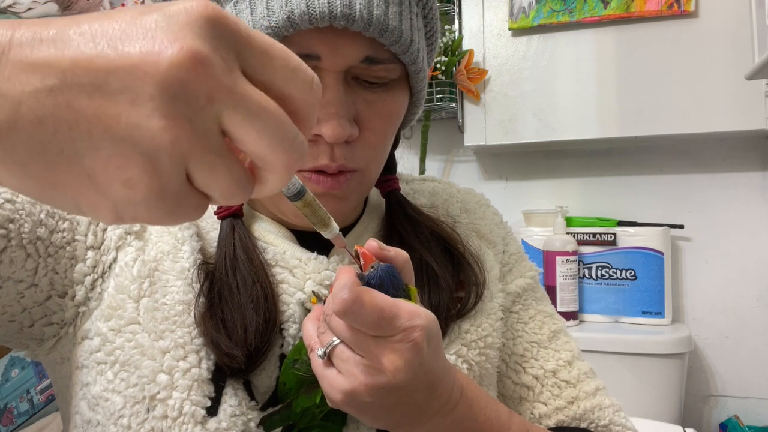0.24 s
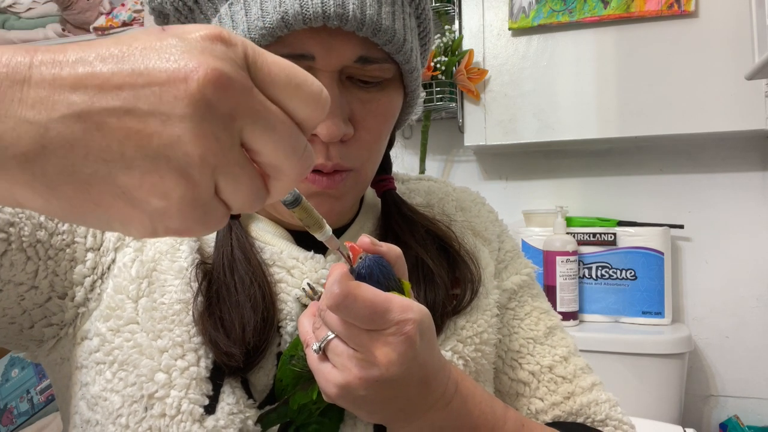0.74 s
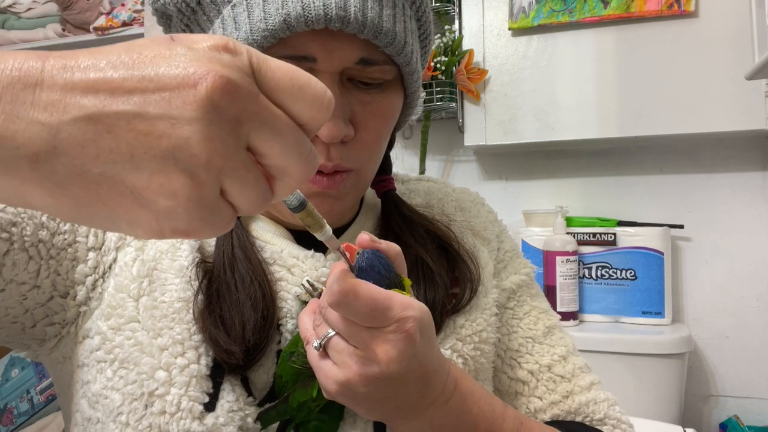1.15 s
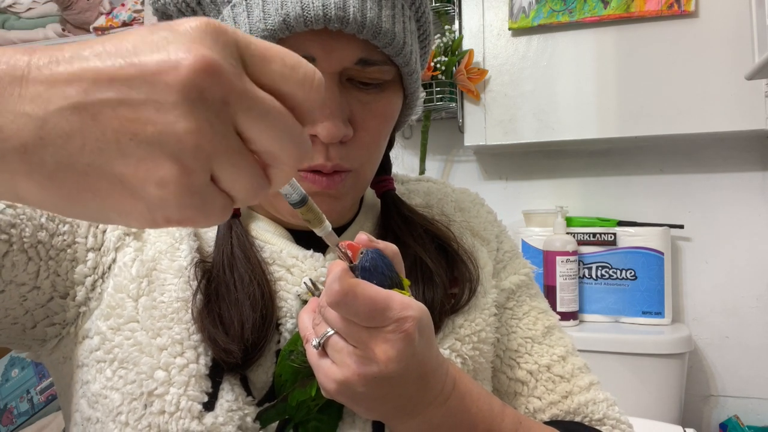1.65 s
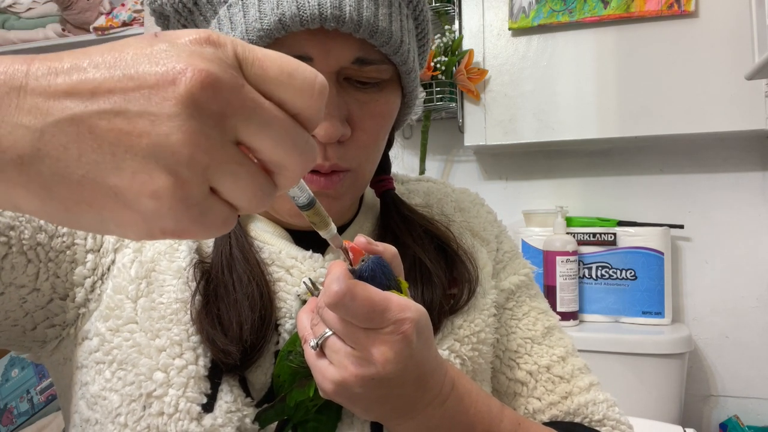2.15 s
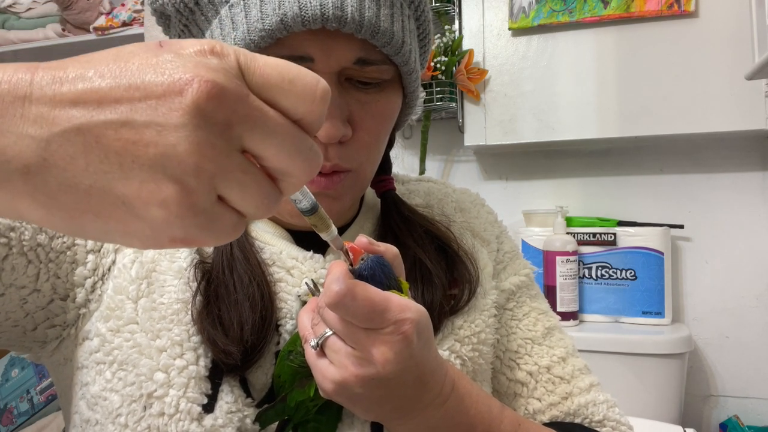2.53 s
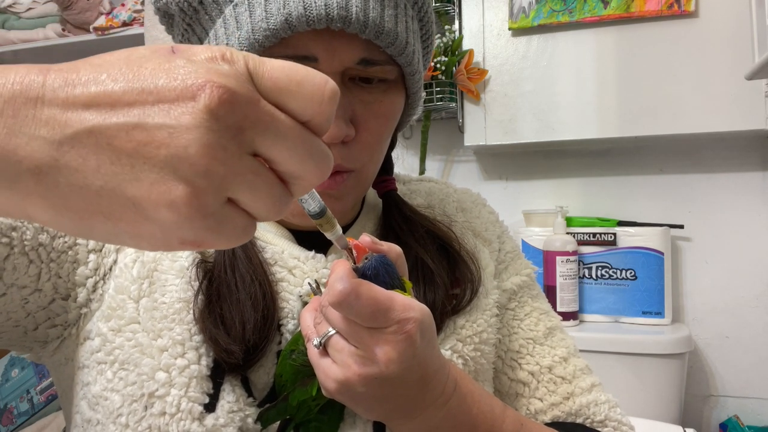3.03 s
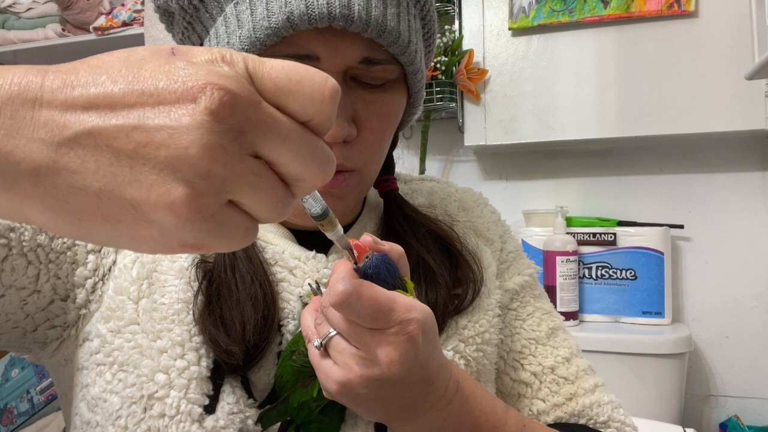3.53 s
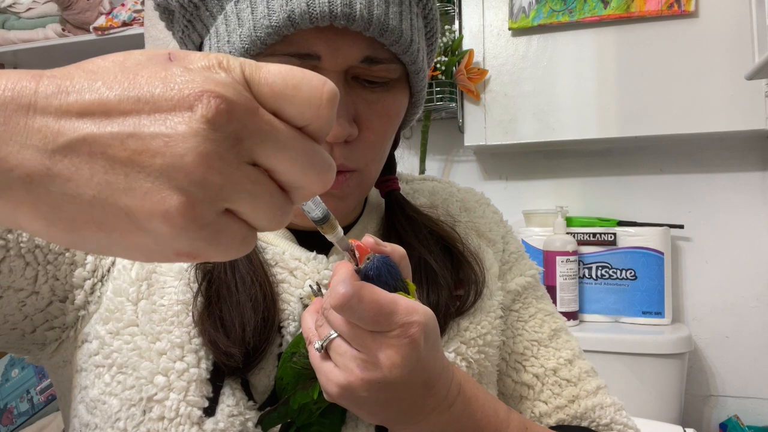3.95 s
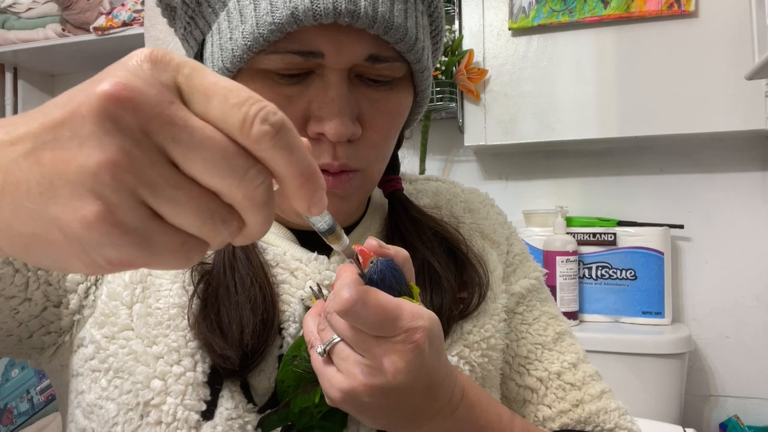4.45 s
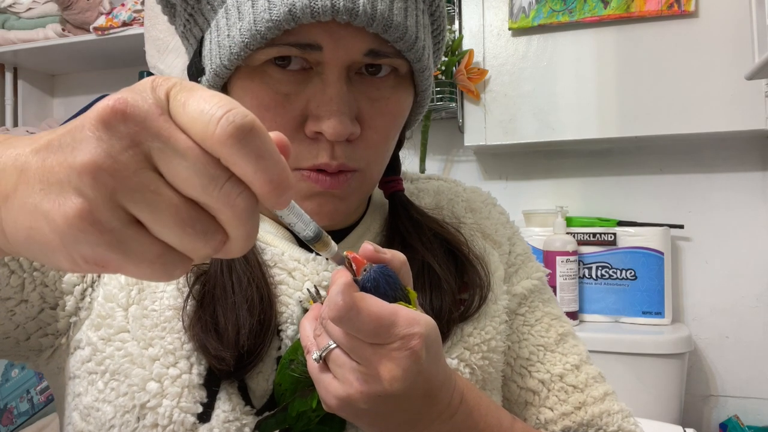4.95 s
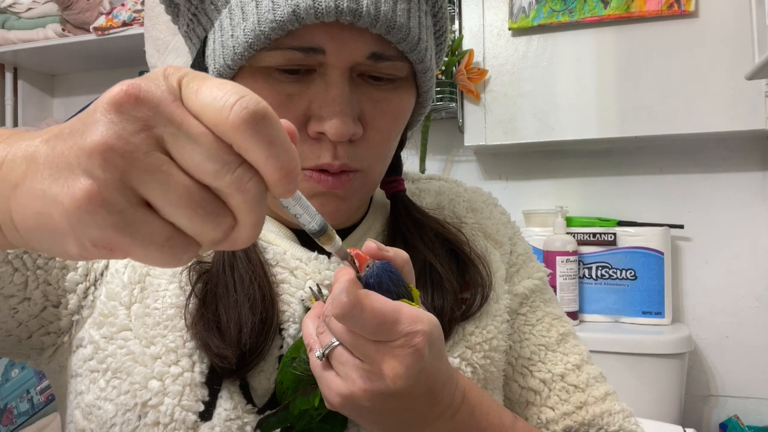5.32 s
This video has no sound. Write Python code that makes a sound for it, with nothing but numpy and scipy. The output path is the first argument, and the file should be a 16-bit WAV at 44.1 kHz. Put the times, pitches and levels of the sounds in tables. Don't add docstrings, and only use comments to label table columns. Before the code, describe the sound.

A small parrot held in the hand screeches close to a stereo microphone in a small tiled room with a short, bright echo. A loud call is already sounding at 0 s, falters briefly, swells and ends at 0.25. Eleven more follow at about 0.45, 0.95, 1.45, 2.0, 2.5, 2.9, 3.4, 3.85, 4.4, 4.7 and 5.2 s, mostly a quarter to a third of a second long; the one at 4.4 is clipped short. The second to fourth are somewhat softer. Each is a hoarse, noisy buzz near 900-1000 Hz, chopped by rapid flutter, with piercing upper rasp and small beak squeaks at the edges. Faint whistled in-breaths come near 0.8, 1.85, 2.8 and 4.2; tiny wet hisses near 1.9, 2.4 and 3.35, a low gulp at 4.25. Hand rumble bumps softly near 1.9 and 4.4 over barely audible hum and air. The last call ends about 5.5.

```python
import sys
import numpy as np
from scipy import signal
from scipy.fft import rfft, irfft, next_fast_len
from scipy.io import wavfile
from scipy.ndimage import uniform_filter1d, map_coordinates

SR = 44100
rng = np.random.default_rng(int(sys.argv[2]) if len(sys.argv) > 2 else 0)


def convert_level_to_amplitude(level_db):
    exponent = np.asarray(level_db, float) / 20
    return 10 ** exponent


def transcribe(signal):
    frames = np.atleast_2d(signal).T
    limited = np.clip(frames, -1, 1)
    pcm = np.round(limited * 32767).astype(np.int16)
    wavfile.write(sys.argv[1], SR, pcm)


N = 246078

# start_s, end_s, swell_to_peak_s, peak_db, sag_until_release_db
CRIES = [(-.2, 0.253, .2, -19, -4.5), (0.441, .765, 0.033, -27.5, -0.5), (0.966, 1.27, .07, -24, -5.5),
         (1.454, 1.79, .08, -25, -2), (1.993, 2.227, .055, -21, -2), (2.491, 2.688, 0.053, -21.5, -2.5),
         (2.876, 3.171, 0.03, -21.5, -3), (3.381, 3.647, 0.089, -21.5, -1.8),
         (3.842, 4.11, 0.045, -21.5, -2), (4.376, 4.528, 0.091, -20.5, -4.5),
         (4.678, 5.015, 0.049, -22.5, -3), (5.211, 5.509, 0.048, -21.5, -6)]
# throat_over_beak_db, throat_drift_over_hold_db, chest_over_beak_db,
# tongue_over_beak_db, flutter_per_s
TRACT = [(0.5, 1, -23, -10, 162), (-12, 3, -19, -6.5, 117), (1, -10, -18, -5, 118),
         (4.5, -2, -17.5, -5, 125), (-4.5, -1.5, -23, -10.5, 115), (-2.5, -1, -18.5, -9.5, 165),
         (-5, 0.5, -22, -12, 115), (-9.5, 2.5, -22, -12, 152), (-7.5, -4.5, -20, -11, 125),
         (-2.5, -0.2, -20.5, -8.5, 100), (-3.5, 3.5, -23.5, -11.5, 130), (-1.5, 1.5, -23, -11, 131)]
# pitch_hz, width_hz, level_db
THROAT = [(3462, 493, 0), (3924, 630, 1)]
TONGUE = [(1918, 1610, 0), (2350, 523, 7), (3046, 816, -1)]
PALATE = [(4985, 520, 1.5), (5847, 550, 3)]
BEAK = [(6913, 896, -2.5), (8706, 983, -3.5), (9760, 1170, -5.5), (13150, 870, -11)]


def unit(x):
    return x / np.sqrt(np.mean(x ** 2) + 1e-20)


def along(points, hz):
    f, v = np.transpose(points)
    return np.interp(np.log(hz + 1), np.log(f + 1), v)


def curves(tables):
    t = np.arange(N) / SR
    s, *cols = np.transpose(np.vstack(tables))
    gate = sum((t >= rows[0][0]) & (t <= rows[-1][0]) for rows in tables)
    return [uniform_filter1d(gate * 1., size=200)] + [np.interp(t, s, c) for c in cols]


def per_call(table):
    return curves([[(a, *row), (b, *row)] for (a, b, *_), row in zip(CRIES, table)])[1:]


def humps(rows):
    edge_db = -14
    return curves([[(a, db + edge_db), (top, db), (b, db + edge_db)] for a, top, b, db in rows])


def wobble(rate):
    return map_coordinates(rng.standard_normal(N // 8), [np.arange(N) * rate / SR])


def filtered(x, response):
    m = next_fast_len(N + SR // 2)
    return irfft(rfft(x, m) * response(np.fft.rfftfreq(m, 1 / SR)), m)[..., :N]


def resonances(modes):
    def response(f):
        return sum((-1) ** k * convert_level_to_amplitude(db) * 1j * f * w / (c * c - f * f + 1j * f * w)
                   for k, (c, w, db) in enumerate(modes))
    return response


def screech():
    # first_pitch_hz, last_pitch_hz, noise_share (0-1), opening_stutter_db
    pitch = [(880, 930, .8, 0), (760, 800, .93, 4), (990, 925, .78, 5), (1004, 992, .46, 7),
             (955, 945, .72, 7), (935, 918, .68, 9), (928, 918, .68, 8), (920, 914, .68, 14),
             (918, 893, .68, 3), (930, 965, .72, 3), (950, 958, .62, 7), (962, 970, .68, 6)]
    # sheen_over_beak_db, palate_over_beak_db, fundamental_over_chest_db
    aim = [(-17, -13, 4.5), (-43.5, -24.5, -7.5), (-16, -16.5, 3.5), (-21, -5, 2.5), (-16.5, -14, 4),
           (-14.5, -8.5, 1), (-14.5, -10.5, 2.5), (-22, -14.5, 3.5), (-15.5, -17.5, -0.5), (-16, -10.5, 2),
           (-14, -3, 4), (-13.5, -3, 5)]
    # pitch_hz, width_hz, level_db
    chest = [(770, 535, 2), (1082, 277, 2.5)]
    # pitch_hz, width_hz, level_db
    sheen = [(14600, 3800, 0)]
    # pitch_hz, level_db (per Hz)
    leak = [(60, -47.5), (130, -23), (250, -17), (450, -24.5), (800, 0.5), (1400, -10), (2500, 3.5),
            (4500, 5), (6200, 6.5), (9000, -22)]

    gate, beak_db, lost_db, throat_shift_db, depth = effort()
    throat_db, _, chest_db, tongue_db, flutter_hz = per_call(TRACT)
    throat_db = throat_db + throat_shift_db
    chest_db = chest_db + 0.86 * lost_db
    tongue_db = tongue_db + 0.55 * lost_db

    _, hz, hoarse = curves([[(row[0], first_hz, share), (row[1], last_hz, share)]
                            for row, (first_hz, last_hz, share, _) in zip(CRIES, pitch)])
    stutter_db = curves([[(a, call[3]), (a + .03, call[3]), (a + .08, 0), (b, 0)]
                         for (a, b, *_), call in zip(CRIES, pitch)])[1]

    turn = 2 * np.pi * np.cumsum(hz * (1 + .006 * wobble(30))) / SR
    shaken = turn + .22 * wobble(700) + .36 * wobble(170)
    pulses = unit(sum(np.cos(k * shaken) for k in range(2, 17)))
    breath = unit(rng.standard_normal(N) * (1.5 + np.cos(shaken)))

    flap = np.cos(2 * np.pi * np.cumsum(flutter_hz * (1 + 0.1479 * wobble(60))) / SR)
    flap = flap + .5 * (flap ** 2 - .5)
    chop = convert_level_to_amplitude(np.clip(depth, 0, 1.2) * (5.5 * flap + 1.8 * wobble(400)) + stutter_db * flap)
    chop = chop / np.sqrt(np.abs(uniform_filter1d(chop ** 2, size=1500)))
    rasp = chop * (np.sqrt(1 - hoarse) * pulses + np.sqrt(hoarse) * breath)

    tone_flutter_db = 5 * hoarse * flap + 1.2 * wobble(80) - stutter_db
    tone = (1 - hoarse) * convert_level_to_amplitude(tone_flutter_db) * np.sin(turn + .9 * hoarse ** 2 * wobble(120))
    sheen_db, palate_db, tone_db = per_call(aim)
    tone = 4.45 * gate * convert_level_to_amplitude(beak_db + chest_db + tone_db - lost_db) * tone

    leaking = gate * convert_level_to_amplitude(beak_db - 4.0) * chop * rng.standard_normal(N)
    voice = filtered(leaking, lambda f: convert_level_to_amplitude(along(leak, f)))
    parts = [(chest, chest_db + 14 * (hoarse - .9)), (TONGUE, np.minimum(tongue_db, -3)),
             (sheen, sheen_db), (PALATE, palate_db), (THROAT, throat_db), (BEAK, 0)]
    for modes, db in parts:
        twice = lambda f: resonances(modes)(f) ** 2
        voice = voice + filtered(gate * convert_level_to_amplitude(beak_db + db) * rasp, twice) / np.std(filtered(rasp, twice))
    return voice, tone


def effort():
    knees = [-7.5, 0.5, -5.5, -4.5, -13, -11, -6.5, -9.5, -5, -12.5, -1, -5]
    attack_s, release_s = 0.021, 0.035
    silent_db, cut_db = -36, -13.5
    throat_opening_db, throat_closing_db = -5, -2
    flutter_opening, flutter_held, flutter_closing = .4, .42, .55
    tables = []
    for (a, b, swell, db, sag), knee_db, (_, drift_db, *_) in zip(CRIES, knees, TRACT):
        tables.append([
            (a, db + silent_db, -silent_db, throat_opening_db, flutter_opening),
            (a + attack_s, db + knee_db, -knee_db, throat_opening_db, flutter_opening),
            (a + swell, db, 0, 0, flutter_held),
            (b - release_s, db + sag, 0, drift_db, flutter_held),
            (b, db + sag + cut_db, -cut_db, drift_db + throat_closing_db, flutter_closing)])
    gate, level_db, lost_db, throat_db, depth = curves(tables)
    falter_db = -8 * np.exp(-((np.arange(N) / SR - 0.065) / .04) ** 2)
    return gate, level_db + falter_db, lost_db - falter_db, throat_db + 5.2 * falter_db, depth


def glides():
    # loudest_s, pitch_hz, glide_hz, level_db
    slides = [(0.229, 2050, -200, -30), (0.743, 2050, -200, -38), (1.255, 2150, -200, -37.5),
              (1.777, 2100, 146.5, -36.5), (2.213, 2250, -250, -39), (2.673, 2250, -250, -37),
              (3.15, 2250, -250, -35.5), (3.411, 2150, -150, -35), (3.632, 2050, 6.5, -28.5),
              (4.094, 2150, -550, -36), (4.392, 2350, 497, -40.5), (4.439, 2600, 104, -37),
              (4.995, 2300, -550, -32.5), (5.485, 2150, -300, -34)]
    in_s, out_s, in_db, out_db = .025, .02, -14, -10
    gate, hz, db = curves([[(s - in_s, hz - glide / 2, db + in_db), (s, hz, db),
                            (s + out_s, hz + glide / 2, db + out_db)] for s, hz, glide, db in slides])
    ring = np.sin(2 * np.pi * np.cumsum(hz) / SR + .5 * wobble(300))
    return gate * convert_level_to_amplitude(db) * (0.98 + wobble(260)) * ring


def catches():
    # start_s, peak_db, low_part_db
    puffs = [(0.4456, -29, -10), (1.4556, -32, 2), (2.0135, -2, -8), (2.4084, -37, -8), (2.4999, -30, -2),
             (2.876, -48, 4), (2.8862, -22, -8.5), (2.0, -24, -6), (3.3443, -52, -14), (3.3797, -27, 0),
             (4.3697, -22, -9), (4.3803, -10, -10), (4.6832, -24, 2), (5.2134, -30, 4)]
    low, high, t = np.zeros(N + SR), np.zeros(N + SR), np.arange(600) / SR
    for s, db, low_db in puffs:
        puff = convert_level_to_amplitude(db - 60 * t / .015) * rng.standard_normal(len(t))
        high[round(s * SR):][:len(t)] += convert_level_to_amplitude(-9) * puff
        low[round(s * SR):][:len(t)] += convert_level_to_amplitude(low_db - 5) * puff
    return filtered(low[:N], resonances(TONGUE + THROAT + PALATE)) + filtered(high[:N], resonances(BEAK))


def intake():
    # start_s, end_s, first_pitch_hz, last_pitch_hz, level_db
    breaths = [
        (0.799, 0.967, 1803, 1645, -67.5),
        (1.84, 2.007, 1750, 1740, -66),
        (2.76, 2.876, 1760, 1560, -68.5),
        (4.168, 4.347, 1800, 1704, -71.5),
        (5.06, 5.131, 1150, 1150, -77),
    ]
    rise_s, soft_db, fade_db = .03, -6, -0.5
    octave_under_db, octave_grows = -16.5, 89
    tables = []
    for a, b, first_hz, last_hz, db in breaths:
        octave = db + octave_under_db
        tables.append([(a, first_hz, db + soft_db, octave + soft_db), (a + rise_s, first_hz, db, octave),
                       (b, last_hz, db + fade_db, octave + octave_grows * (b - a))])
    gate, hz, level_db, octave_db = curves(tables)
    turn = 2 * np.pi * np.cumsum(hz * (1 + .024 * wobble(250))) / SR
    throb = 4 * wobble(110)
    whistle = convert_level_to_amplitude(level_db + throb + 4.0) * np.sin(turn)
    return gate * (whistle + convert_level_to_amplitude(octave_db + throb + 3.5) * np.sin(2 * turn + .8 * wobble(67)))


def swallow():
    # start_s, peak_s, end_s, peak_db
    gulps = [
        (1.9, 1.935, 1.98, -66.5),
        (2.385, 2.412, 2.45, -66.5),
        (3.338, 3.352, 3.375, -66),
    ]
    # start_s, peak_s, end_s, peak_db
    gurgles = [
        (4.232, 4.248, 4.31, -63),
    ]
    gate, db = humps(gulps)
    hiss = gate * convert_level_to_amplitude(db + 3 * wobble(300)) * unit(filtered(rng.standard_normal(N), resonances(BEAK)))
    gate, db = humps(gurgles)
    return hiss + gate * convert_level_to_amplitude(db) * unit(filtered(rng.standard_normal(N), resonances([(470, 52, 0)])))


def ports(x):
    # pitch_hz, left_leads (radians)
    phase = [(0, 0), (1300, -.3), (2500, -2.1), (4000, -2), (4500, -3), (5400, -3.1), (6000, -5.1),
             (7000, -6.2), (8100, -6.3), (9200, -4.7), (10500, -3.2), (12200, -3.1), (13000, -1.6),
             (13700, 0)]
    # pitch_hz, left_over_right_db
    balance = [(60, -9), (400, -0.5), (900, -10.5), (1300, -0.5), (1800, 3), (2400, 2.5), (2800, -6.5),
               (3600, -5), (4200, -5), (5600, -10), (6500, -1.5), (7200, 0)]

    def half(f):
        return convert_level_to_amplitude(along(balance, f) / 2) * np.exp(.5j * np.interp(f, *np.transpose(phase)))
    return filtered(x, lambda f: np.array([half(f), 1 / half(f)]))


def tiles(x):
    # pitch_hz, time_to_fall_60_db_s
    wall_ring = [(300, 0.49), (1000, 0.3), (3500, 0.25), (7000, 0.22), (12000, 0.18)]
    sway = 2 * np.pi * 0.558 * np.arange(N) / SR
    hz, t, z = signal.stft(rng.standard_normal((2, 2, SR // 3)), SR, nperseg=256)
    near = convert_level_to_amplitude(-60 * t / 0.081)
    walls = convert_level_to_amplitude(-10.5 - 60 * t / along(wall_ring, hz)[:, None])
    tail = signal.istft(z * (near + walls), SR, nperseg=256)[1]
    parts = np.pad(x * [np.cos(sway), np.sin(sway)], ((0, 0), (100, 0)))[:, None]
    return signal.fftconvolve(parts, tail / np.linalg.norm(tail[0, 0]), axes=2).sum(axis=0)[:, :N]


def background():
    # pitch_hz, level_db (per Hz)
    floor = [(25, -27.5), (60, -24.5), (200, -9.5), (450, -12.5), (900, -19), (2000, -25.5), (8000, -36.5),
             (14000, -53)]
    shared, own = rng.standard_normal(N), rng.standard_normal((2, N))
    air = convert_level_to_amplitude(-84) * unit(filtered(shared + .4 * own, lambda f: convert_level_to_amplitude(along(floor, f))))
    hum = convert_level_to_amplitude(-88.0) * np.sin(2 * np.pi * 60 * np.arange(N) / SR)
    thud = rng.standard_normal(N) + .45 * rng.standard_normal((2, N))
    rumble = unit(filtered(thud, lambda f: resonances([(62, 60, 0)])(f) ** 3))
    return air + hum + handling() * convert_level_to_amplitude(np.array([[-1.8], [1.8]])) * rumble


def handling():
    # time_s, level_db, time_to_fall_20_db_s
    shifts = [
        (1.86, -58.5, 0.27),
        (4.43, -62.5, 0.27),
    ]
    shake_db, sag_db, rest_db, rise_s = -73.5, -3, -88, .08
    t = np.arange(N) / SR
    shakes = [[(a - rise_s, rest_db), (a + rise_s, shake_db), (b, shake_db + sag_db)] for a, b, *_ in CRIES]
    gain = convert_level_to_amplitude(curves(shakes + [[(N / SR, rest_db)]])[1])
    for s, db, fall in shifts:
        gain = gain + convert_level_to_amplitude(db - 20 * np.maximum((t - s) / fall, (s - t) / rise_s))
    return gain


def thin_bands(x):
    # part (0 mid, 1 side), low_hz, high_hz, share of the loud frames (0-1)
    dropped = [(0, 4210, 4400, .42), (0, 4400, 4650, .66), (0, 9900, 10350, .3), (0, 10350, 10900, .82),
               (0, 10900, 12400, .92), (0, 13700, 14300, .35), (0, 14300, 15000, .2),
               (0, 15000, 16000, .35), (1, 7000, 7500, .5), (1, 7500, 8250, .75), (1, 8250, 8700, .25),
               (1, 11900, 12500, .3), (1, 13500, 17000, .92)]
    hz, t, z = signal.stft([x[0] + x[1], x[0] - x[1]], SR, nperseg=1024)
    level = uniform_filter1d(np.log10(np.mean(np.abs(z[0]) ** 2, axis=0) + 1e-14), size=3)
    loud = level > level.max() - 1.5
    slope = np.gradient(level)
    jump = 4 * np.clip(slope, 0, 1) + 2.5 * np.abs(slope) * loud
    for side, low_hz, high_hz, share in dropped[::-1]:
        near = (hz > low_hz - 500) & (hz < high_hz + 100)
        power = np.mean(np.abs(z[side][near]) ** 2, axis=0)
        strength = uniform_filter1d(np.log10(power + 1e-14) - level, size=15)
        chance = uniform_filter1d(uniform_filter1d(rng.standard_normal(len(t)), size=9), size=5)
        keep = jump + .4 * strength * loud + chance
        keep = keep + (low_hz < 5000) * (~loud + .9 * (level.max() - level))
        empty = keep < np.quantile(keep[loud], share)
        z[side][np.ix_((hz > low_hz) & (hz < high_hz), empty)] = 0
    mid, side = signal.istft(z, SR, nperseg=1024)[1][:, :N]
    return np.array([mid + side, mid - side]) / 2


def scene():
    voice, tone = screech()
    tone = tone + convert_level_to_amplitude(2.5) * glides()
    voice = voice + catches()
    tone = tone + intake()
    bird = voice + swallow()
    direct = convert_level_to_amplitude(0.17) * ports(bird + tone)
    echo = convert_level_to_amplitude(-2.5) * tiles(bird + convert_level_to_amplitude(-11) * tone)
    return direct + echo + background()


def low_pass(x):
    return signal.sosfilt(signal.butter(12, 17060, fs=SR, output="sos"), x)


def record(dry):
    limited = filtered(dry, lambda hz: 1 / (1 + (hz / 15780) ** 400))
    return low_pass(thin_bands(limited))


dry = scene()
out = record(dry)
transcribe(out)
```